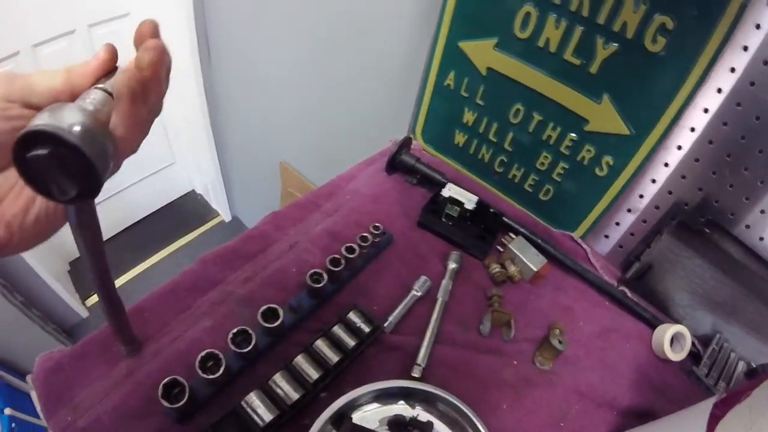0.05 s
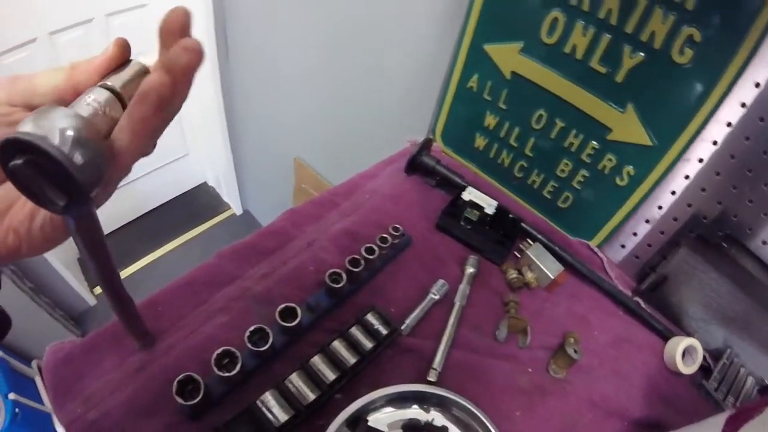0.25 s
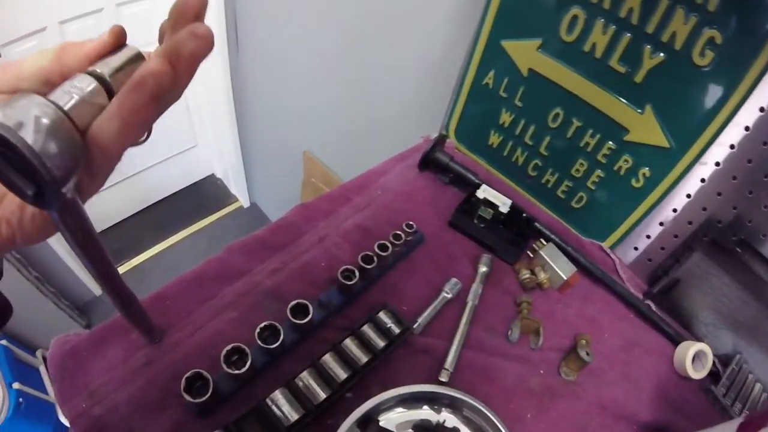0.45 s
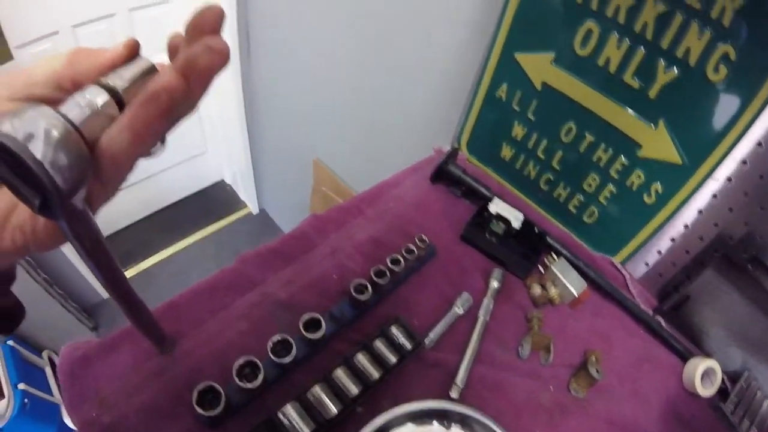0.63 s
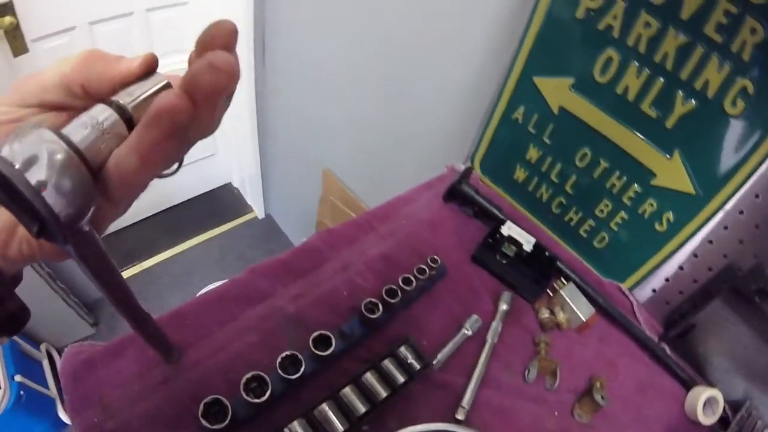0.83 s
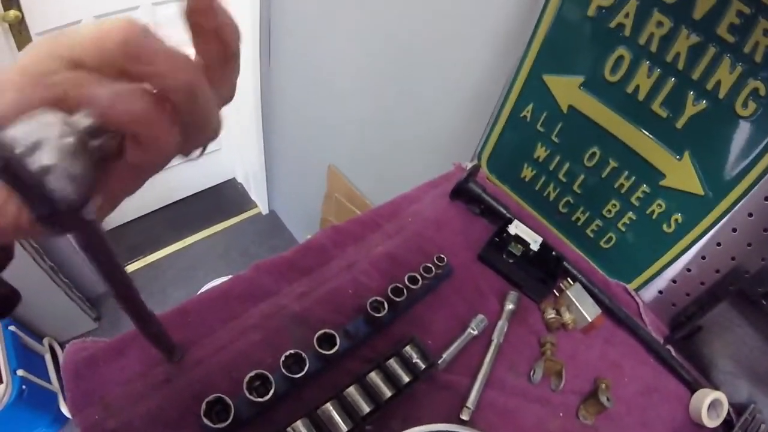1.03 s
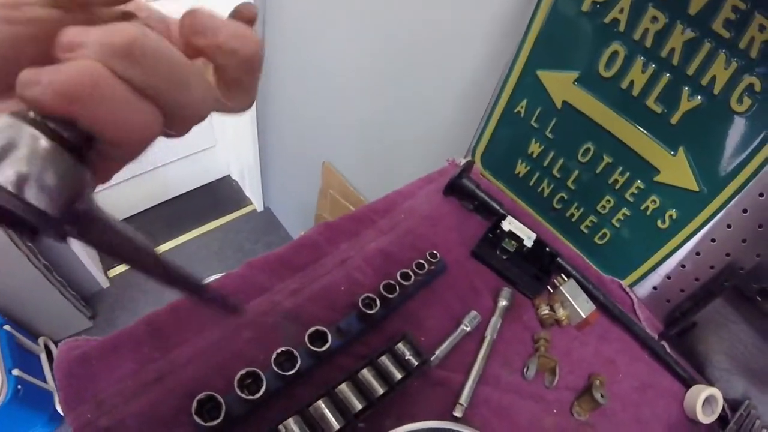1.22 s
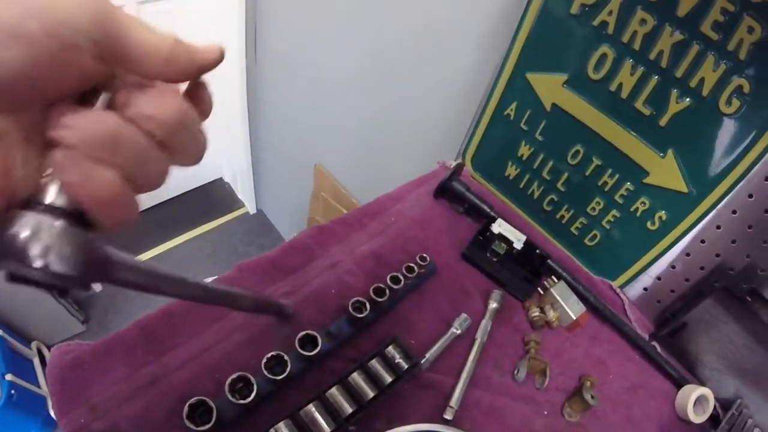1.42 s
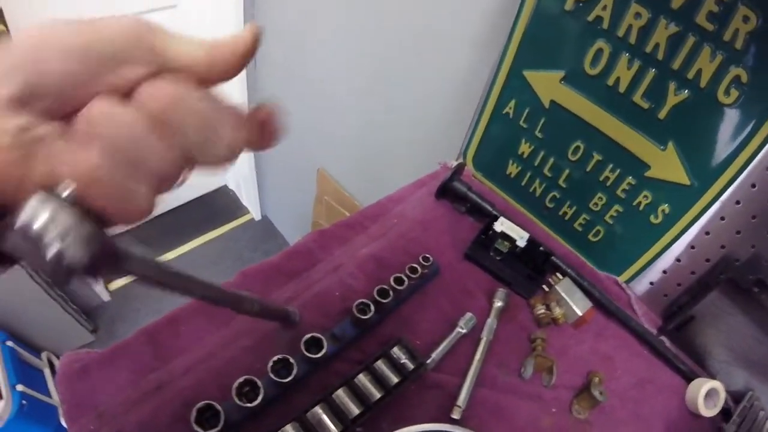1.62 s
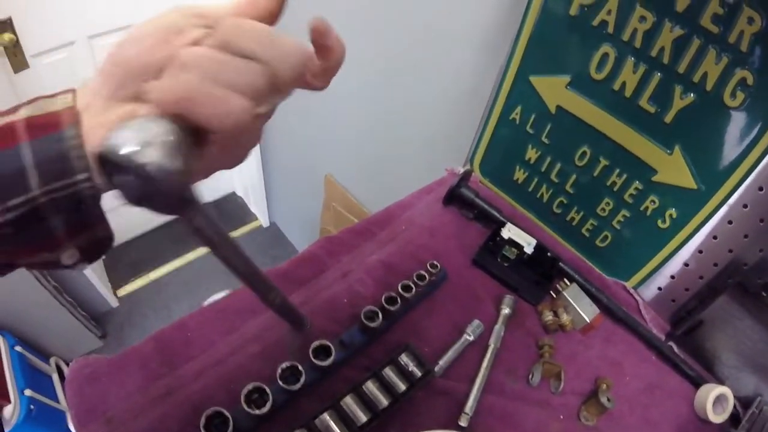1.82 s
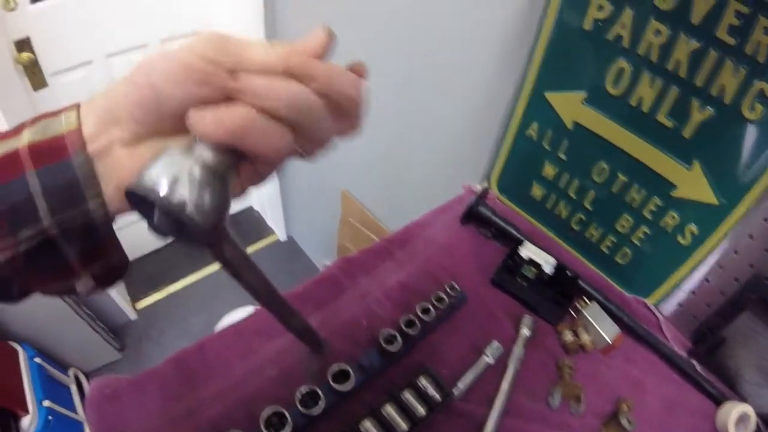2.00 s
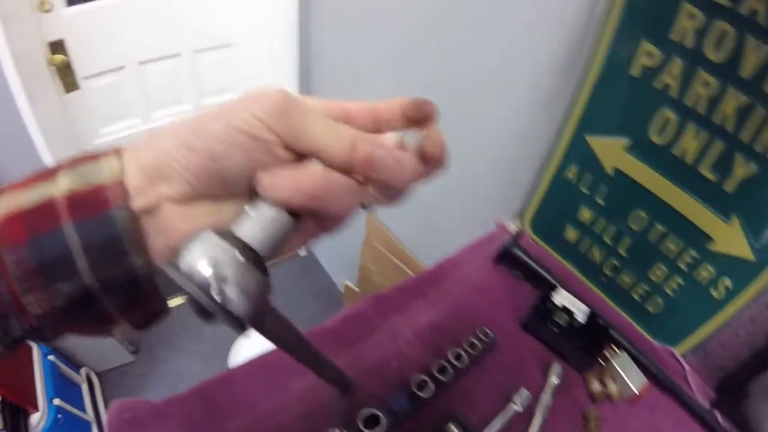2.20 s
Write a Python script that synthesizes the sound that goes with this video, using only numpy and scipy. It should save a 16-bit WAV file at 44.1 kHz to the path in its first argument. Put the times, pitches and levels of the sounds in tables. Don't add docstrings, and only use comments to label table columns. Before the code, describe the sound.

Bright metallic ratchet clicks, spaced out at first, a padded thump, then a quick clicking run

```python
import sys
import numpy as np
from scipy import signal
from scipy.fft import rfft, irfft
from scipy.io import wavfile

SR = 44100
rng = np.random.default_rng(int(sys.argv[2]) if len(sys.argv) > 2 else 0)


def nominal_scale(level):
    x = np.asarray(level, float) / 20
    return 10 ** x


def dump_mix(stems):
    frames = np.atleast_2d(stems).T
    limited = np.clip(frames, -1, 1)
    pcm = np.round(limited * 32767).astype(np.int16)
    wavfile.write(sys.argv[1], SR, pcm)


N = 99269
LEAD = 2048
M = N + LEAD

# start_s, then ring level_db of the main, low, mid and top families
SLOW_CLICKS = [
    (-.012, -41, -51.5, -35, -64),
    (0.1178, -32, -47.5, -40, -67),
    (0.25, -36.5, -53, -39.5, -51),
    (0.3634, -40, -39, -42, -57),
    (0.4997, -32.5, -44, -40.5, -58),
    (0.7303, -43, -45, -38.5, -52),
]
QUICK_CLICKS = [
    (1.5454, -29.5, -43.5, -43.5, -61),
    (1.6021, -28.5, -45, -38, -47),
    (1.6362, -32, -37.5, -51, -48.5),
    (1.6551, -37.5, -35.5, -49, -44.5),
    (1.6726, -49, -46, -43, -44),
    (1.6923, -35.5, -56, -40.5, -38),
    (1.7119, -39, -62, -61, -42),
    (1.7301, -40, -47, -46, -41),
    (1.7771, -40.5, -48.5, -46.5, -45),
]
# pitch_hz, level_db, t60_s
LOW_MODES = [(2814, -1.5, 0.1), (2894, 5, 0.045), (3086, -5, .05)]
MID_MODES = [(4955, -3.5, .08), (5121, 0.5, 0.11), (5150, 1, 0.11), (5420, -0.5, 0.073), (5490, -11.5, .05)]
MAIN_MODES = [(7460, -12, 0.13), (7790, 5, 0.038), (8007, 6.5, 0.045), (8260, -31, 0.073),
              (7380, -15.5, 0.078), (8580, -13, 0.063)]
HIGH_MODES = [(11090, 0.5, .1), (11290, 1, 0.11), (11335, 0, 0.033)]
TOP_MODES = [(13950, -8, 0.12), (14520, 2, .08), (14600, -8, 0.054)]
# pitch_hz, level_db, t60_s
GRIT_MODES = [(2170, -53.5, 0.019), (2504, -51, .012), (3300, -52.5, 0.0073), (4660, -52.5, 0.0092),
              (5560, -43.5, 0.0059), (6760, -50.5, 0.024), (8450, -50, 0.015), (9800, -56.5, 0.0071),
              (10600, -47, 0.0076), (11900, -52, 0.0087), (14700, -55, .015)]
# pitch_hz, level_db, t60_s
HANDLE_MODES = [(153, -54, 0.11), (201.5, -50.5, 0.14), (294, -57.5, 0.065), (396, -54.5, 0.051),
                (763, -58.5, 0.07), (925, -53.5, 0.087), (2130, -51, 0.014)]
KNOCK_MODES = [(95, -50, 0.14), (154.1, -29.5, 0.38), (206.3, -21.5, 0.3), (238, -19, 0.04), (296, -40, .1),
               (333, -21.5, 0.073), (391, -16.5, 0.061), (467.5, -39.5, 0.3), (569, -41, 0.13),
               (634, -50, 0.21), (791, -43, 0.09), (912, -41.5, 0.055)]
# start_s, peak level_db, brightness centre pitch_hz
LOOSE_TICKS = [
    (1.0964, -56.5, 3000),
    (1.1954, -55.5, 3600),
    (1.3865, -30, 3520),
    (1.4299, -37, 2960),
    (1.481, -42, 3700),
    (1.9374, -58.5, 5100),
    (2.0637, -48.5, 4800),
]
# pitch_hz, level_db (per Hz)
CRACK_SPECTRUM = [(500, -43), (850, 2.5), (1300, -6.5), (2300, -0.5), (4000, -5.5), (7500, -0.5),
                  (11000, -4), (13000, -10.5)]
BENCH_SPECTRUM = [(70, -10.5), (150, 6), (230, 1), (420, -6.5), (700, -18), (1200, -31)]
AIR_SPECTRUM = [(50, 4), (154, -5), (400, -13.5), (900, -16), (1500, -25.5), (3840, -31.5), (9000, -41.5),
                (15000, -56)]

KNOCK_S = 1.3862


def rms_one(x):
    return x / np.sqrt(np.mean(x ** 2) + 1e-20)


def at(s):
    return np.round(np.asarray(s) * SR).astype(int) + LEAD


def train(s, size):
    x = np.full(M, 1e-18)
    np.add.at(x, at(s), size)
    return x


def ring(x, hz, t60):
    radius = nominal_scale(-60 / (t60 * SR))
    angle = 2 * np.pi * hz / SR
    return signal.lfilter([0, np.sin(angle)], [1, -2 * radius * np.cos(angle), radius ** 2], x)


def ring_all(x, modes):
    return sum(nominal_scale(db) * ring(x, hz, t60) for hz, db, t60 in modes)


def fade(s, db, t60):
    return signal.lfilter([1], [1, -nominal_scale(-60 / (t60 * SR))], train(s, nominal_scale(db)))


def coloured(points):
    hz, db = np.transpose(points)
    f = np.maximum(np.fft.rfftfreq(M, 1 / SR), 1)
    gain = nominal_scale(np.interp(np.log(f), np.log(hz), db, left=-60, right=-60))
    return rms_one(irfft(rfft(rng.standard_normal(M)) * gain, M))


def soft(x, hz):
    r = np.exp(-2 * np.pi * hz / SR)
    return signal.lfilter([(1 - r) ** 2], [1, -2 * r, r * r], x)


def random_touches(per_s):
    return (rng.random(M) < per_s / SR) * rng.standard_normal(M)


def pawl():
    rise_s, hold_s, seat_s, seated_db = 0.0032, 0.0071, 0.0044, -6.5
    spread_db, detune = 2.5, .005
    rough_db, rough_hz = 4.0, 120
    s, main, low, mid, top = np.transpose(SLOW_CLICKS + QUICK_CLICKS)
    high = np.repeat([-47.5, -39.5], [len(SLOW_CLICKS), len(QUICK_CLICKS)])  # dB, slow and quick
    start = s - .001

    crack_db = -35 + 0.18 * (main + 33)
    out = fade(start, crack_db, 0.029) * coloured(CRACK_SPECTRUM)
    snap = coloured([(11000, 3), (13000, 0), (16500, -8)])
    out = out + fade(start, crack_db - 8, 0.0087) * snap

    t = np.arange(SR // 8) / SR
    seating = nominal_scale(seated_db * np.clip((t - hold_s) / seat_s, 0, 1))
    shape = np.minimum(t / rise_s, 1) * seating
    where = at(start)[:, None] + np.arange(len(t))
    families = [(LOW_MODES, low), (MID_MODES, mid), (MAIN_MODES, main), (HIGH_MODES, high), (TOP_MODES, top)]
    for modes, db in families:
        for hz, mode_db, t60 in modes:
            vary, shift, phase = rng.uniform(-1, 1, (3, len(s), 1))
            flutter = rms_one(soft(rng.standard_normal((len(s), len(t))), rough_hz))
            level_db = db[:, None] + mode_db + spread_db * vary + rough_db * flutter
            wave = np.sin(2 * np.pi * hz * (1 + detune * shift) * t + np.pi * phase)
            np.add.at(out, where, nominal_scale(level_db - 60 * t / t60) * shape * wave)
    return out


def grit():
    start_s, end_s, touches_per_s = 1.635, 1.75, 430
    t = (np.arange(M) - LEAD) / SR
    on = np.clip((t - start_s) / 0.0082, 0, 1) * np.clip((end_s - t) / 0.01 + 1, 0, 1)
    return sum(ring_all(on * random_touches(touches_per_s) + 1e-18, [mode]) for mode in GRIT_MODES)


def handle():
    start_s, end_s, jolts_per_s = 1.645, 1.8, 180
    t = (np.arange(M) - LEAD) / SR
    jolting = (t > start_s) & (t < end_s)
    jolt_on = jolting * (rng.random(M) < jolts_per_s / SR)
    s = np.transpose(QUICK_CLICKS)[0]
    out = 0
    for mode in HANDLE_MODES:
        jolts = jolt_on * rng.standard_normal(M)
        clicks = train(s, 2.4 * rng.standard_normal(len(s)))
        out = out + ring_all(jolts + clicks, [mode])
    return out


def knock():
    contact_hz, lean_hz, lean_s, bounce_s = 300, 120, 0.0034, 0.00582
    lean = soft(train([KNOCK_S - lean_s], .6), lean_hz)
    blow = train([KNOCK_S, KNOCK_S + bounce_s], [1, 0.15])
    push = soft(lean - blow, contact_hz)
    rings = sum((1 + (mode[0] / contact_hz) ** 2) * ring_all(push, [mode]) for mode in KNOCK_MODES)
    bench = soft(fade([KNOCK_S], -27, .3), 40.0) * coloured(BENCH_SPECTRUM)
    return rings + bench


def ticks():
    white = rng.standard_normal(M)
    out = 0
    for s, db, hz in LOOSE_TICKS:
        band = signal.butter(2, [hz / 1.8, hz * 2.2], "band", fs=SR)
        out = out + fade([s - .001], db - 5.5, 0.045) * signal.lfilter(*band, white)
    first_s, first_db, _ = LOOSE_TICKS[0]
    brief_ring = ring(train([first_s], nominal_scale(first_db + 3.5)), 3000, 0.027)
    tap = ring(train([LOOSE_TICKS[-1][0]], nominal_scale(-50)), 863, 0.057)
    return out + brief_ring + tap


def room(x):
    level_db, t60_s, wall_cut_hz = -8.5, 0.21, 24000
    t = np.arange(SR // 2) / SR
    arrival = np.clip(t / 0.0028 - .4, 0, 1)
    tail = soft(rng.standard_normal(len(t)) * nominal_scale(-60 * t / t60_s) * arrival, wall_cut_hz)
    return nominal_scale(level_db) * signal.fftconvolve(x, tail / np.sqrt(np.sum(tail ** 2)))[:M]


def air():
    lumps = rms_one(soft(rng.standard_normal(M), 18.0))
    band = signal.butter(2, [18, 45], "band", fs=SR, output="sos")
    rumble = rms_one(signal.sosfilt(band, rng.standard_normal(M)))
    return nominal_scale(-56) * coloured(AIR_SPECTRUM) + nominal_scale(-57 + 1.5 * lumps) * rumble


def scene():
    sources = pawl() + grit() + ticks() + knock() + handle()
    return (sources + room(sources) + air())[None, LEAD:]


def roll_off(x):
    return signal.sosfilt(signal.butter(12, 16490, fs=SR, output="sos"), x)


def record(dry):
    top_cut = signal.butter(8, 16000, fs=SR, output="sos")
    mix = signal.sosfilt(top_cut, dry)
    return roll_off(mix)


dry = scene()
out = record(dry)
dump_mix(out)
```